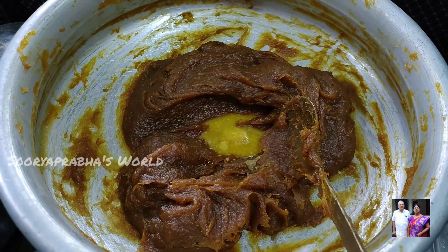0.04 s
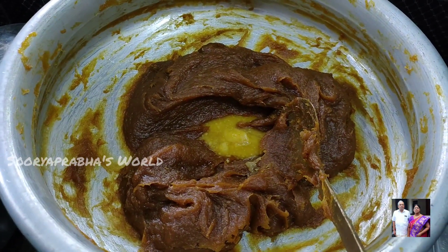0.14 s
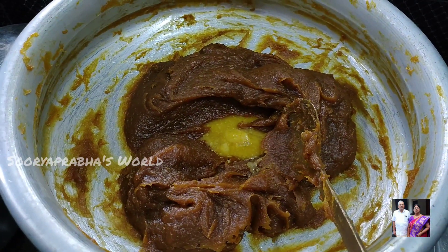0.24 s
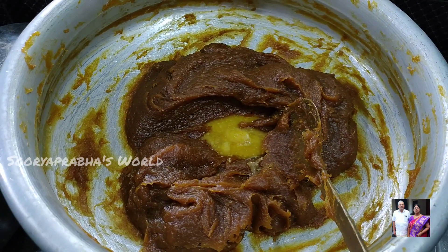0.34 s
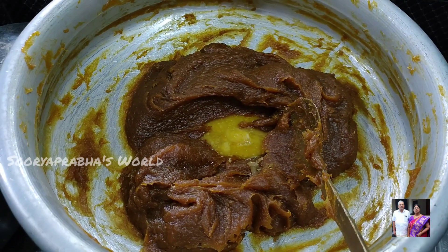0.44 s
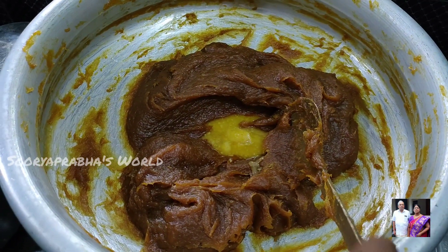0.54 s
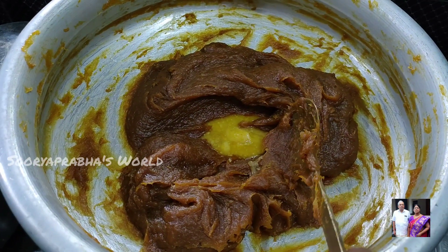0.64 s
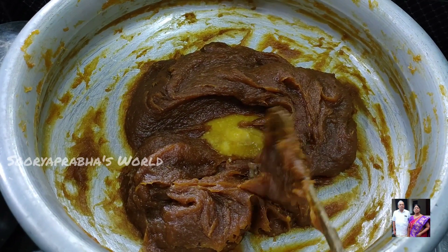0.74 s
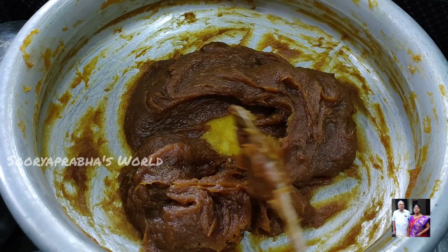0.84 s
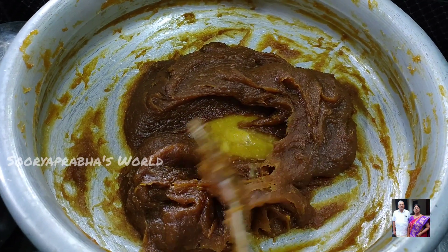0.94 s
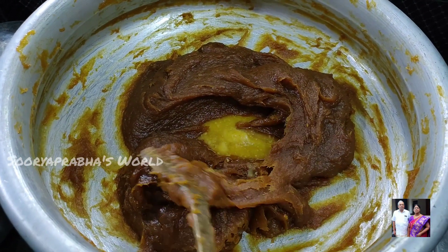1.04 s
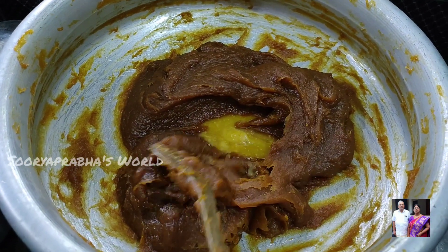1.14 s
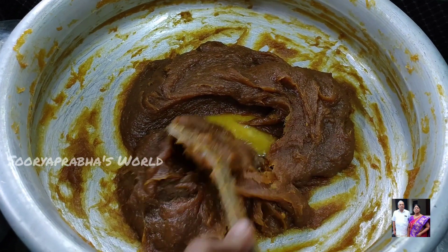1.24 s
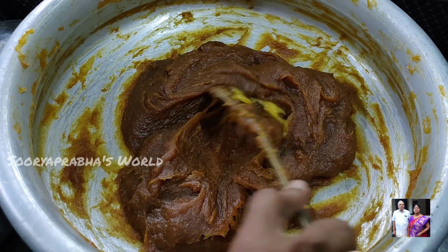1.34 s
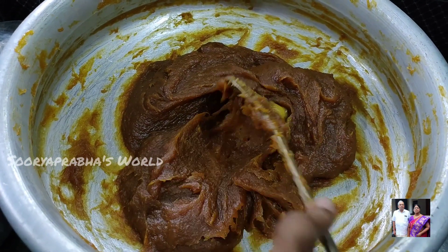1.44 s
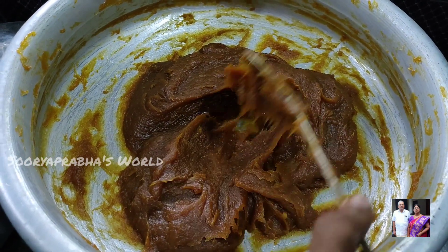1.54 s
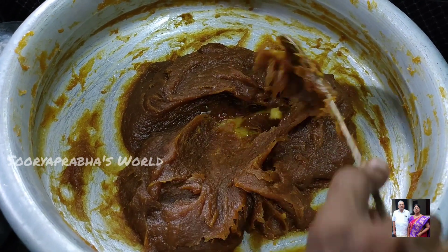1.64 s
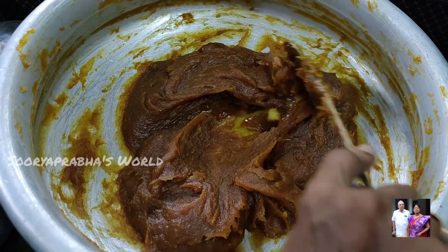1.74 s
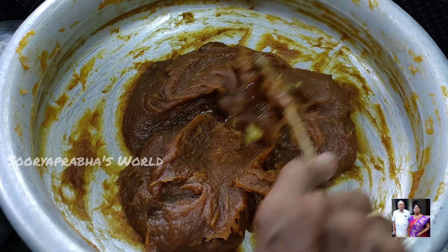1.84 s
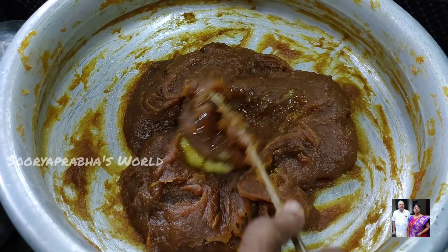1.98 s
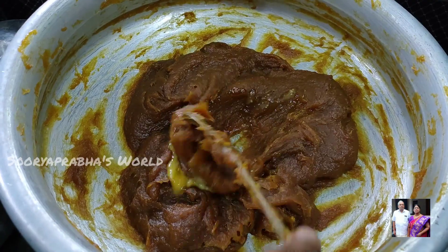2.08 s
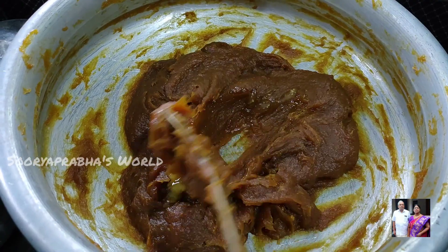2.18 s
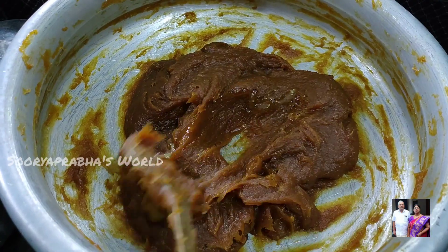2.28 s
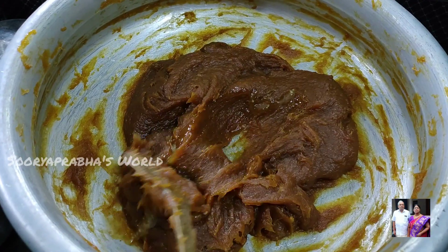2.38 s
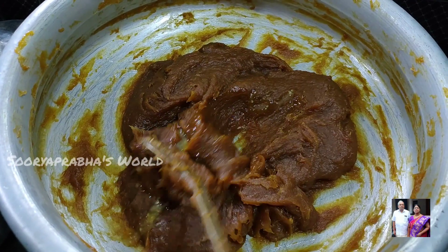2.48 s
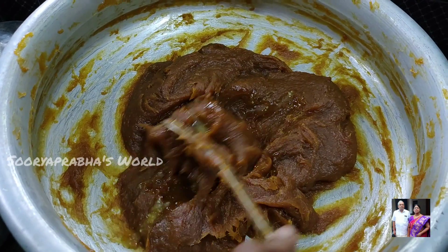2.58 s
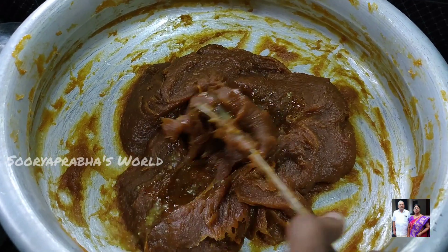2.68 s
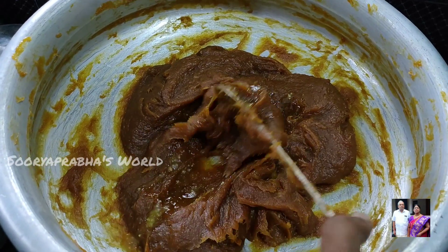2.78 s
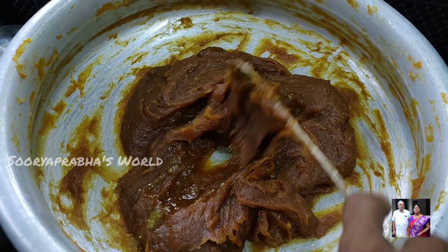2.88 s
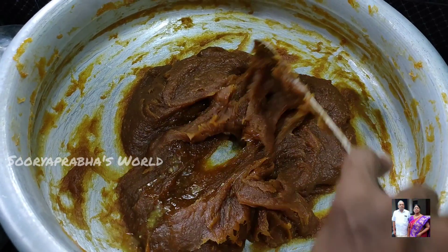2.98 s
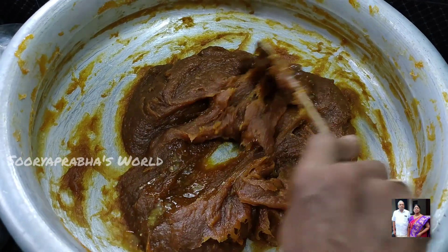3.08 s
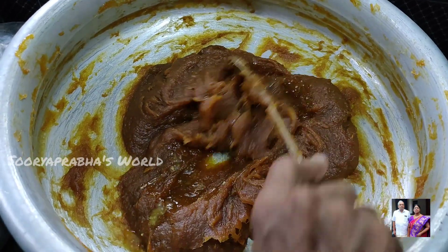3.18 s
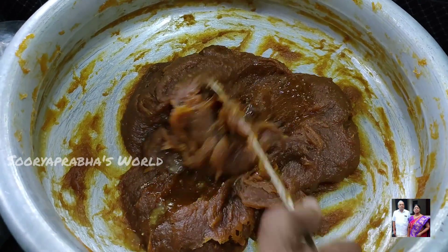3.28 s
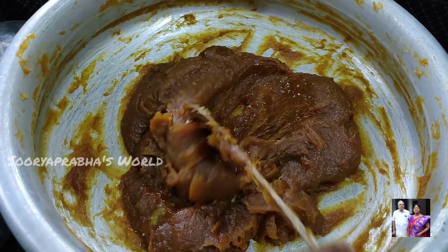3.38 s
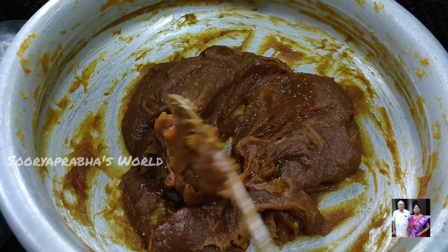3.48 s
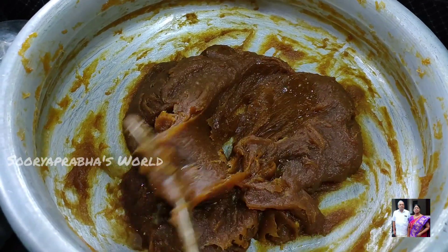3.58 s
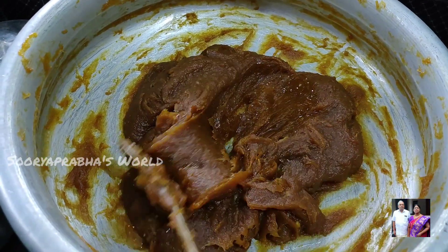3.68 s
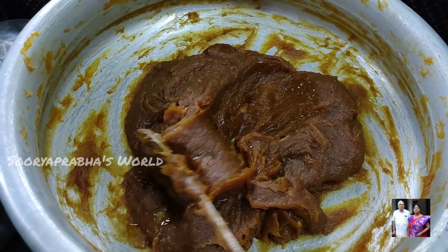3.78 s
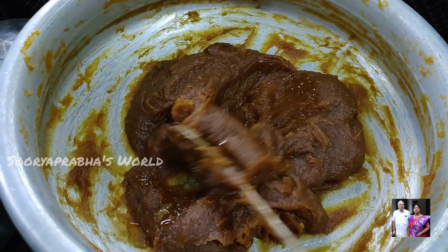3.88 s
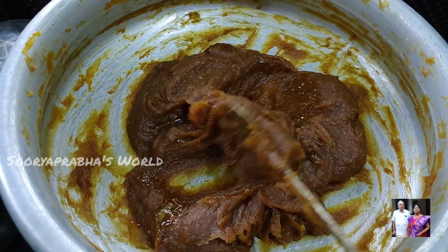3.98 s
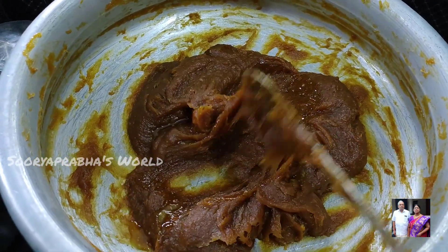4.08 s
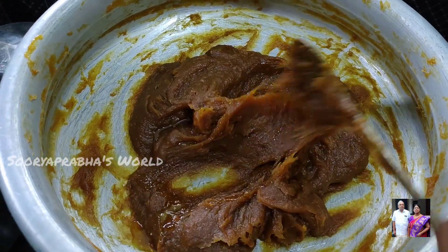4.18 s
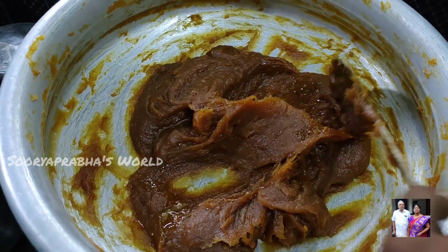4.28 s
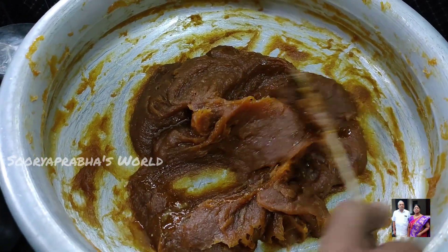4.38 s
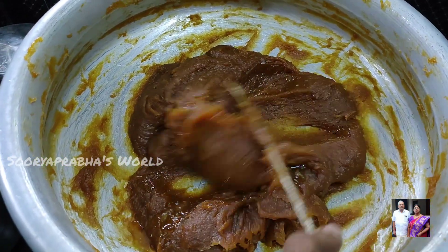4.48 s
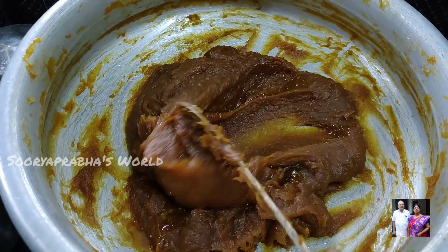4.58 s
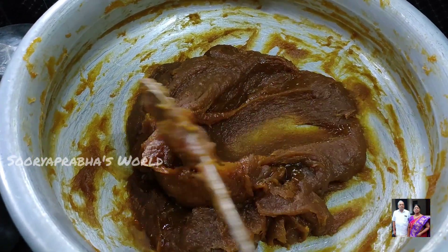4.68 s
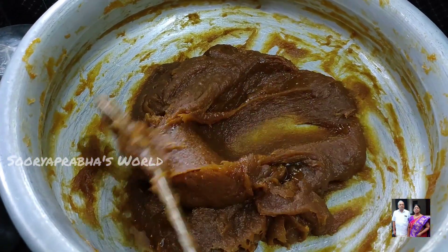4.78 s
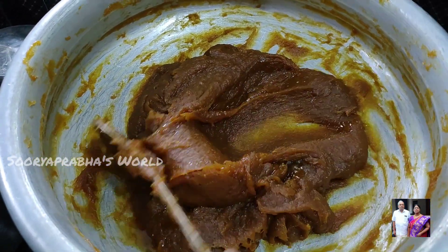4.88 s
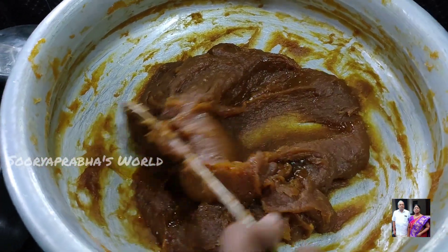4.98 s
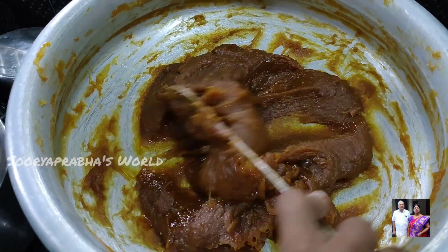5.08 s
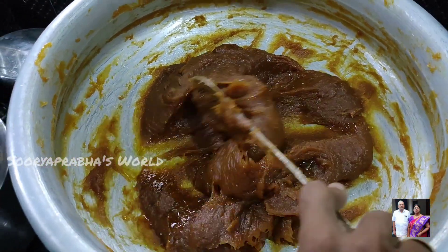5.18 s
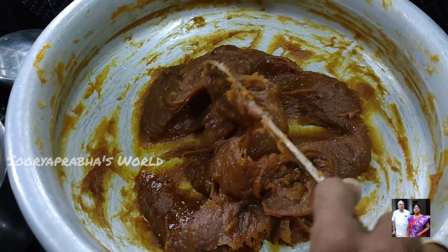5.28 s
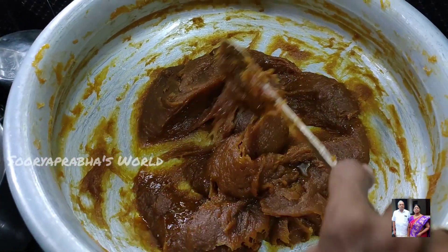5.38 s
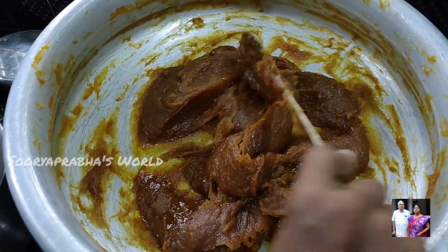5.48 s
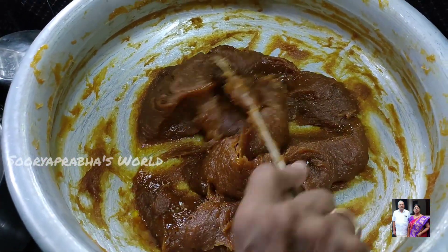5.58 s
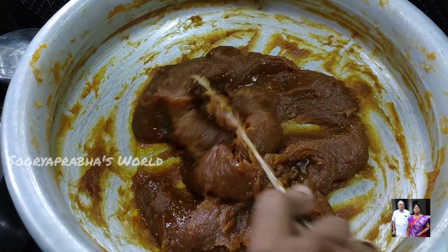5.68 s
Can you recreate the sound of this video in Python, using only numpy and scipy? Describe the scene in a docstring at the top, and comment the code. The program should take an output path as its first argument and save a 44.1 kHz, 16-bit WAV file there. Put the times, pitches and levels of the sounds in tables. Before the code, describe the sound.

Heard close in a kitchen with a slight echo and faint hiss, a spoon lightly taps a wide metal pan and its handle slides over the rim. It then works through thick, sticky paste in about eight strokes, with dull humming thuds, brief raspy drags and soft wet ticks. One stroke squeaks briefly, the next lands hardest, and a bright ringing clink on the pan's side finishes the stirring.

```python
"""A hollow hush and a few light touches of metal, then a spoon's handle slides over a pan's rim.
The spoon folds thick sweet paste in the wide metal pan, in a hard-walled kitchen. Each stroke lands
on the base with a dull thud and a crack, then drags over it; the paste ticks softly in between.
At the end the spoon strikes the bare wall of the pan, which rings."""
import sys
import numpy as np
from scipy import signal
from scipy.fft import rfft, irfft, next_fast_len
from scipy.io import wavfile
from scipy.ndimage import uniform_filter1d

SR = 44100
rng = np.random.default_rng(int(sys.argv[2]) if len(sys.argv) > 2 else 0)


def unload_audio(sound):
    """Save the sound as a 16-bit wav file, at the path given as the first command line argument."""
    columns = np.transpose(np.atleast_2d(sound))
    # keep every value between -1 and 1, then stretch to whole-number steps
    steps = np.round(np.clip(columns, -1, 1) * 32767)
    wavfile.write(sys.argv[1], SR, steps.astype(np.int16))


N = 252781

# the spoon lands on the base: (time [s], thud [dB], upper mode offset [dB], knock [dB], crack [dB])
BLOWS = [(1.252, -30, -9.5, -40, -45.5), (1.9623, -31, -4.5, -62, -47.5), (2.4965, -29.5, -7, -38.5, -46),
         (3.186, -35.5, -2, -52, -55), (3.7549, -31, -4, -44.5, -54), (4.4265, -35.5, -7, -68, -59),
         (4.9630, -22.5, 2, -36, -35.5), (5.654, -38, -1, -59, -50.5)]
# the spoon drags over the base: (time [s], length [s], rasp [dB], sizzle [dB])
DRAGS = [(1.319, 0.12, -51, -47), (1.779, 0.044, -67, -76), (1.872, 0.061, -62.5, -63),
         (2.25, .2, -79.5, -58.5), (2.605, 0.11, -54.5, -49), (3.075, 0.045, -66.5, -63),
         (3.201, 0.15, -49, -43), (3.476, 0.15, -67, -71), (3.845, 0.081, -52.5, -52.5),
         (4.425, .045, -45, -38.5), (5.167, 0.082, -51.5, -65)]
# the spoon strikes the bare wall: (time [s], level [dB])
CLANGS = [(5.587, -33.5)]
# the edge squeals as it slips: (time [s], length [s], pitch [Hz], level [dB])
SQUEAKS = [(4.444, 0.018, 6700, -37.5), (4.453, 0.0056, 6630, -48)]
# soft wet ticks of paste; the last is the spoon's edge grazing the pan: (time [s], level [dB])
TICKS = [(1.657, -62), (1.779, -61), (1.824, -58), (2.896, -64), (3.09, -59.5), (3.613, -58), (4.16, -58.5),
         (4.809, -64), (4.851, -64), (4.936, -44)]
# the handle slides over the rim: (time [s], length [s], level [dB])
RUBS = [(0.634, .05, -49), (0.73, 0.011, -60.5)]
# the spoon lightly touches the wall: (time [s], level [dB])
TOUCHES = [(.004, -54), (.022, -57.5), (.157, -54.5), (.205, -60.5), (0.283, -58.5), (.378, -60.5)]

# modes of the paste-laden base and of the free wall: (pitch [Hz], level [dB], t60 [s])
BASE_MODES = [(234.3, -11.5, 0.78), (288.1, -2, 0.19), (286.5, -7.5, 0.8), (328.3, -8, 0.37),
              (416, -9.5, 0.18), (499, -19.5, 0.73), (603, -20, 0.6), (855, -21, 0.21)]
WALL_MODES = [(506, -26, .6), (641, -26, .6), (1071, -23, .5), (1179, -9, .52), (1303, -9, .65),
              (1830, -15, .25), (2045, -11, .25), (2083, -5, .5), (2767, -22, .55), (2988, -10, .3),
              (3682, -13, .3), (3779, -14, .33), (3960, -15, .9), (4090, -14, .3), (4435, -1, .2),
              (5206, -12, .3), (5340, -10, .32), (5728, -8, .4), (5870, 0, .38), (6455, -5, .27),
              (7020, -4, .32), (7106, -2, .25), (7407, -18, .6), (7628, -19, .4)]
# how strongly rubbing feeds the wall's modes: (frequency [Hz], gain [dB])
RUB_FEED = [(550, 12), (1070, 12), (1180, 3), (1300, 9), (2050, -5), (2750, 8), (3100, -8), (4400, -13),
            (6500, -10), (7500, -13)]

# noise colours: (frequency [Hz], level [dB])
CRACK_EQ = [(120, -30), (400, -1), (800, 3), (1200, 1.5), (1800, 0.5), (3000, 2), (4200, 0.5), (5200, -3.5),
            (8000, -18.5)]  # spoon snapping onto the base
SIZZLE_EQ = [(2500, -53.5), (4200, 1.5), (5100, -6.5), (5800, 9.5), (6400, 10), (7100, 4.5), (7800, -6),
             (8600, -77)]  # sugary film under the edge
RASP_EQ = [(50, -30), (100, -4.5), (170, 1), (290, 5.5), (500, 5.5), (1000, -0.5), (1800, 0.5), (3000, 4.5),
           (4200, -1.5), (5200, -4), (8000, -21)]  # slips sounding through the pan
CLACK_EQ = [(300, -68), (1200, -9), (2500, -18), (4000, 1.5), (4800, -15), (5700, 13.5), (7100, 4),
            (8000, -15.5)]  # metal on bare metal
SLIDE_EQ = [(100, -15), (300, 3), (700, 2.5), (1000, -3), (1370, 9), (1550, -1), (2400, -1), (2850, 3.5),
            (3200, -3), (4400, -3.5), (4900, -6), (6600, 4.5), (8000, -15.5)]  # friction on the rim
BRUSH_EQ = [(300, -19), (2300, -18), (2800, -14), (3500, -18.5), (3900, -12.5), (5300, -13), (5750, 2),
            (6400, -1.5), (7200, -10), (8200, -28)]  # a light touch
HUSH_EQ = [(200, -17), (750, -14), (1000, -1), (1130, 2.5), (1280, 1.5), (1500, -29), (3000, -22)]  # the hollow hush
ROOM_TONE_EQ = [(20, 2.5), (45, -0.5), (100, -7), (165, -15), (280, -12), (500, -13), (950, -18.5),
                (1250, -10.5), (1450, -15.5), (2400, -13.5), (3900, -13.5), (4600, -4), (5250, -10),
                (6500, -1.5), (8000, -19)]  # the kitchen's hiss

# the kitchen's reverb decay: (frequency [Hz], t60 [s])
KITCHEN_DECAY = [(120, 1), (300, 0.61), (1000, 0.6), (4000, 0.49), (8000, 0.53)]
# reflections off the nearest surfaces: (delay [s], gain [linear])
ECHOES = [(.0082, .25), (.0182, .38), (.0255, .2), (.036, .2)]


def blows():
    """The base gives a few damped swings and hums on; spoon and squeezed paste crack above it."""
    out, t = np.zeros(N), np.arange(SR) / SR
    low_cut = signal.butter(4, 175, "highpass", fs=SR, output="sos")  # the pan radiates no deep bass
    # the contact snaps, then grinds briefly as the spoon settles
    contact = (decay(t, t60=0.022) + amp(-13) * decay(t, t60=0.15)) * rise(t, attack_s=0.00064)
    for s, thud_db, upper_db, knock_db, crack_db in BLOWS:
        thud = amp(thud_db) * ring([(314, -1.5, 0.026), (411, upper_db, 0.028)], scatter_db=0.8)
        hum = amp(thud_db - 9.5) * ring(BASE_MODES, scatter_db=2.2)
        hum *= rise(t, attack_s=0.009)  # builds as the spoon eases off
        knock = ring([(726, -1.5, 0.035), (874, -5, 0.023), (1210, -8, 0.023)], scatter_db=1.5)
        body = kitchen(thud, wet_db=-5) + hum + kitchen(amp(knock_db) * knock, wet_db=3)
        add(out, s, -signal.sosfilt(low_cut, body))
        crack = amp(5.5) * burst(contact, CRACK_EQ)
        sizzle = amp(6) * burst(contact, SIZZLE_EQ)
        add(out, s, kitchen(amp(crack_db) * (crack + sizzle), wet_db=6.5))
    return out


def drags():
    """Dense slips rasp through the pan while the sugary film sizzles under the edge."""
    out = np.zeros(N)
    slips = grains(N, per_s=6000, spread_db=2.5)
    rasp = amp(-6) * coloured(slips, RASP_EQ)
    sizzle = amp(-9) * coloured(slips, SIZZLE_EQ)
    for s, length, rasp_db, sizzle_db in DRAGS:
        pressure = swell(s, length, attack_s=0.04, release_s=0.017)
        out += pressure * (amp(rasp_db) * rasp + amp(sizzle_db) * sizzle)
    return kitchen(out, wet_db=-1.5)


def clangs():
    """Metal on bare metal: a hard clack with a brief scrape, and every mode of the wall rings."""
    out, t = np.zeros(N), np.arange(SR) / SR
    for s, db in CLANGS:
        tone = amp(-1.8) * ring(WALL_MODES, scatter_db=1) * rise(t, attack_s=0.002)
        clack = amp(3.5) * burst(decay(t, t60=0.058), CLACK_EQ)
        scrape = amp(-20) * burst(decay(t, t60=0.13), SLIDE_EQ)
        add(out, s, amp(db) * (tone + kitchen(clack + scrape, wet_db=-2)))
    return out


def squeaks():
    """For a moment the slips lock into one unsteady high note."""
    out = np.zeros(N)
    for s, length, hz, db in SQUEAKS:
        size = round(length * SR)
        unsteady_hz = hz * (1 + 0.051 * rng.standard_normal(size))
        phase = 2 * np.pi * np.cumsum(unsteady_hz) / SR
        add(out, s, amp(db) * signal.windows.tukey(size) * np.sin(phase))
    return kitchen(out, wet_db=-21)


def ticks():
    """Soft wet ticks of paste; the last and loudest is the spoon's edge grazing the pan before a blow."""
    out, t = np.zeros(N), np.arange(SR // 8) / SR
    envelope = rise(t, attack_s=0.0011) * decay(t, t60=0.079)
    for s, db in TICKS:
        pops = grains(len(t), per_s=43000, spread_db=11)
        crackle = coloured(pops, SIZZLE_EQ) + 0.081 * coloured(pops, RASP_EQ)
        add(out, s, amp(db) * envelope * crackle)
    return kitchen(out, wet_db=-10)


def rim_rub():
    """The handle's soft friction feeds mostly the low modes of the wall, which swell and ring on."""
    t = np.arange(2 * SR) / SR
    force, singing = np.zeros(len(t)), np.zeros(len(t))
    for s, length, db in RUBS:
        force += amp(db) * swell(s, length, attack_s=min(length, 0.059), release_s=0.012)[:len(t)]
    for hz, db, t60 in WALL_MODES:
        retained = amp(-120 / (t60 * SR))  # share of the mode's energy left after one sample
        energy = signal.lfilter([1 - retained], [1, -retained], force ** 2)
        # slips jostle the phase while the contact lasts
        drift = 0.01 * np.cumsum(rng.standard_normal(len(t)) * force / force.max())
        singing += amp(db + curve_at(RUB_FEED, hz)) * np.sqrt(energy) * np.sin(2 * np.pi * hz * t + drift)
    friction = amp(-6) * force * coloured(grains(len(t), per_s=7600, spread_db=1), SLIDE_EQ)
    return np.pad(singing + kitchen(friction, wet_db=6.5), (0, N - len(t)))


def touches():
    """A light touch is a short brush of slips that wakes only the wall's high modes."""
    out, t = np.zeros(N), np.arange(SR) / SR
    lowest_hz, tilt_db_per_octave = 2500, -7  # a soft touch feeds the highest modes least
    high_modes = [(hz, db + tilt_db_per_octave * np.log2(hz / lowest_hz), t60)
                  for hz, db, t60 in WALL_MODES if hz > lowest_hz]
    for s, db in TOUCHES:
        brush = decay(t, t60=0.16) * coloured(grains(SR, per_s=5000, spread_db=1.5), BRUSH_EQ)
        tone = amp(-4.5) * ring(high_modes, scatter_db=2.5)
        add(out, s, amp(db) * rise(t, attack_s=0.0018) * (brush + tone))
    return kitchen(out, wet_db=2)


def hush():
    """A hollow puff of noise opens the scene and fades at once."""
    envelope = swell(0, length=0.013, attack_s=0.0013, release_s=0.071)
    hollow = coloured(grains(N, per_s=5000, spread_db=2), HUSH_EQ)
    return kitchen(amp(-57.5) * envelope * hollow, wet_db=-4)


def room_tone():
    """The steady hiss of the kitchen, a bed under everything."""
    return amp(-68.5) * coloured(rng.standard_normal(N), ROOM_TONE_EQ)


def kitchen(x, wet_db):
    """Hard walls add a few near echoes and a diffuse tail to the direct sound."""
    hz, t, noise = signal.stft(rng.standard_normal(SR), SR, nperseg=256)
    fade = decay(t, t60=curve_at(KITCHEN_DECAY, hz)[:, None])
    tail = signal.istft(noise * fade, SR, nperseg=256)[1]
    tail *= rise(np.arange(len(tail)) / SR, attack_s=0.0023)
    response = amp(wet_db) * tail / np.linalg.norm(tail)
    response[0] += 1  # the direct sound
    for delay, gain in ECHOES:
        response[round(delay * SR)] += gain
    return signal.fftconvolve(x, response)[:len(x)]


def ring(modes, scatter_db):
    """One second of modes (pitch [Hz], level [dB], t60 [s]), each at a fresh strength."""
    t = np.arange(SR) / SR
    return sum(amp(db + scatter_db * rng.standard_normal()) * decay(t, t60) * np.sin(2 * np.pi * hz * t)
               for hz, db, t60 in modes)


def burst(envelope, colour):
    """A snap of dense slips under a short envelope, evened out so that it has no pitch."""
    size = len(envelope)
    spectrum = rfft(envelope * grains(size, per_s=12000, spread_db=0.5))
    smooth_power = np.abs(uniform_filter1d(np.abs(spectrum) ** 2, size=90)) + 1e-20
    snap = irfft(spectrum / np.sqrt(smooth_power), size)
    snap[size // 2:] = 0  # keep the tail silent
    return coloured(snap, colour) * np.sqrt(np.mean(envelope ** 2))


def grains(size, per_s, spread_db):
    """Tiny slips at random moments, of uneven strength."""
    slips = (rng.random(size) < per_s / SR) * rng.standard_normal(size)
    return slips * amp(spread_db * rng.standard_normal(size))


def swell(s, length, attack_s, release_s):
    """An envelope that rises smoothly from time s, holds to the end of its length, then dies away."""
    t = np.arange(N) / SR - s
    onset = np.sin(np.pi / 2 * np.clip(t / attack_s, 0, 1)) ** 2
    return onset * np.exp(-np.maximum(t - length, 0) / release_s)


def rise(t, attack_s):
    """An exponential fade-in."""
    return 1 - np.exp(-t / attack_s)


def decay(t, t60):
    """A fade of 60 dB every t60 seconds."""
    return amp(-60 * t / t60)


def coloured(x, colour):
    """x through an EQ curve, at rms 1."""
    shaped = filtered(x, lambda hz: amp(curve_at(colour, hz)))
    return shaped / np.sqrt(np.mean(shaped ** 2) + 1e-20)


def filtered(x, response):
    """x with a gain of response(hz) at each frequency."""
    size = next_fast_len(len(x) + 8192)
    return irfft(rfft(x, size) * response(np.fft.rfftfreq(size, 1 / SR)), size)[:len(x)]


def curve_at(points, hz):
    """Read (frequency [Hz], value) points on a log axis."""
    points_hz, values = np.transpose(points)
    return np.interp(np.log(hz + 1), np.log(points_hz + 1), values)


def amp(db):
    """Decibels to gain."""
    return 10 ** (np.asarray(db) / 20)


def add(track, s, sound):
    """Mix a sound in at time s."""
    part = track[max(round(s * SR), 0):][:len(sound)]
    part += sound[:len(part)]


def scene():
    """The mono mix, as heard from just above the pan."""
    opening = hush() + touches() + rim_rub()
    folding = blows() + drags() + ticks() + squeaks()
    return (opening + folding + clangs() + room_tone())[None]


def record(dry):
    """A steep high cut takes the top off the whole mix."""
    cutoff_hz = 8080
    return np.array([filtered(x, lambda hz: 1 / np.sqrt(1 + (hz / cutoff_hz) ** 80)) for x in dry])


dry = scene()
out = record(dry)
unload_audio(out)
```